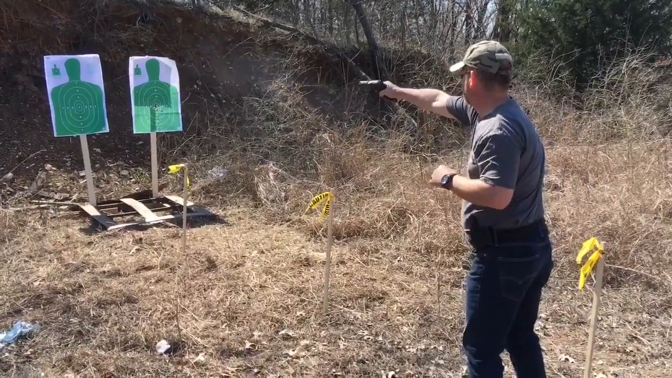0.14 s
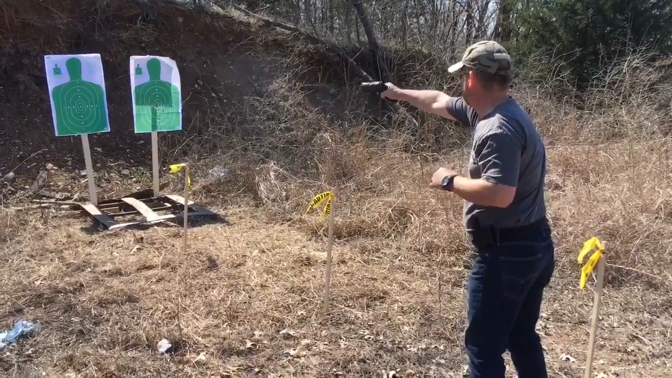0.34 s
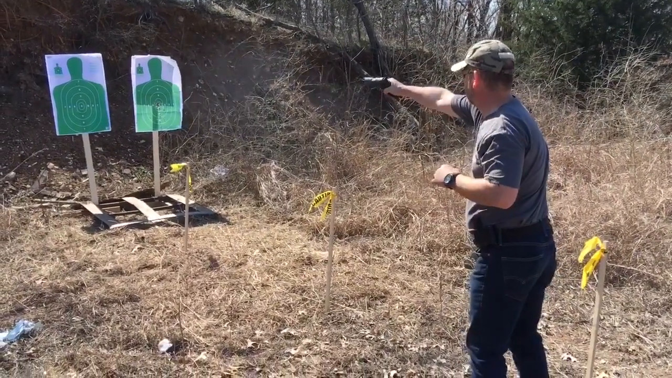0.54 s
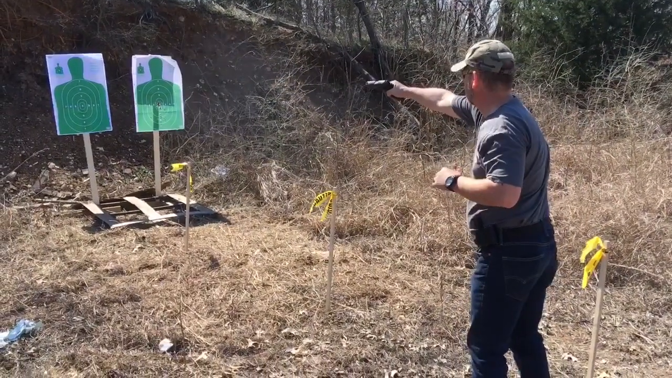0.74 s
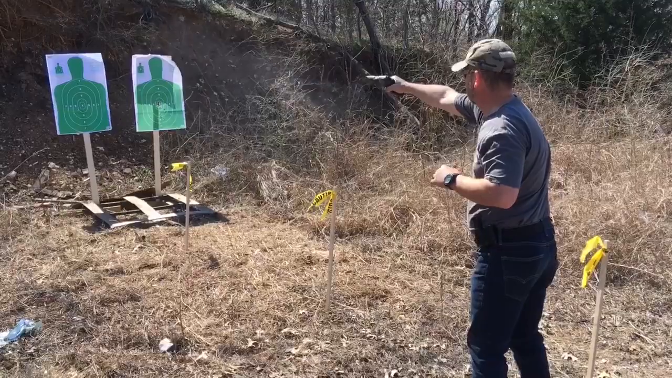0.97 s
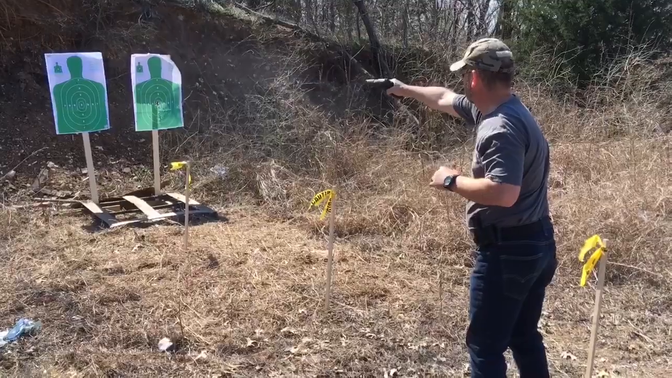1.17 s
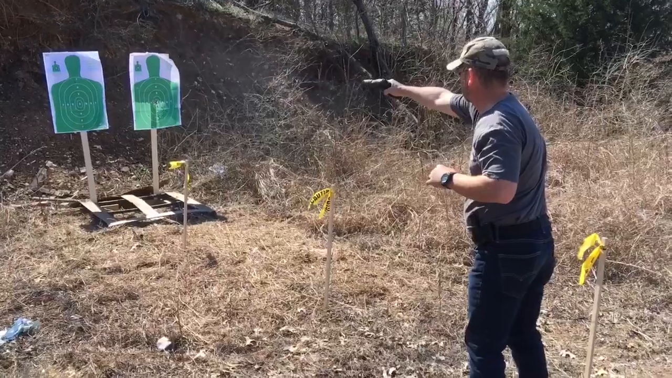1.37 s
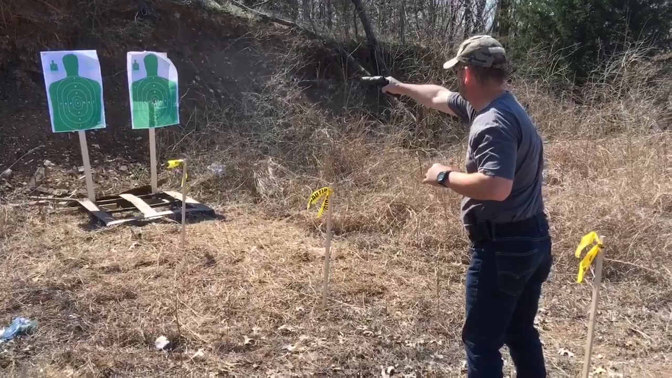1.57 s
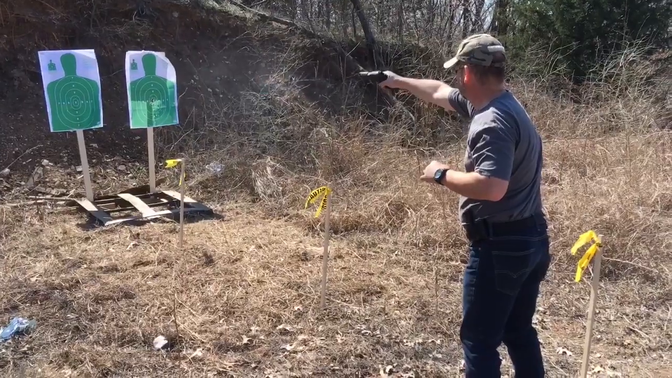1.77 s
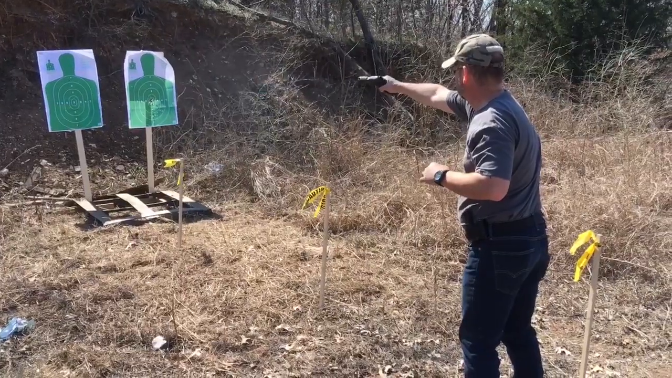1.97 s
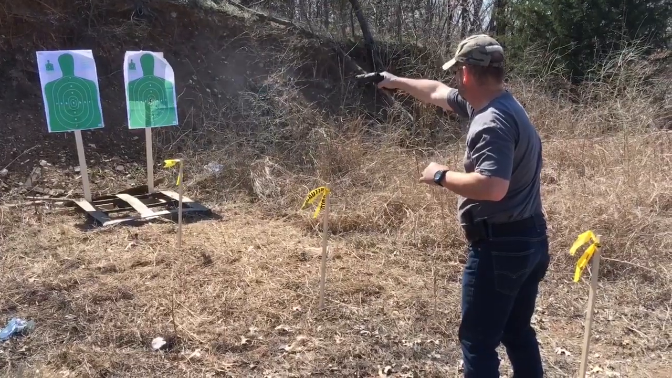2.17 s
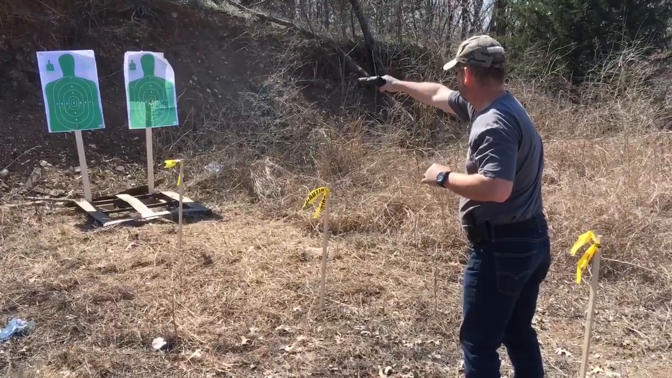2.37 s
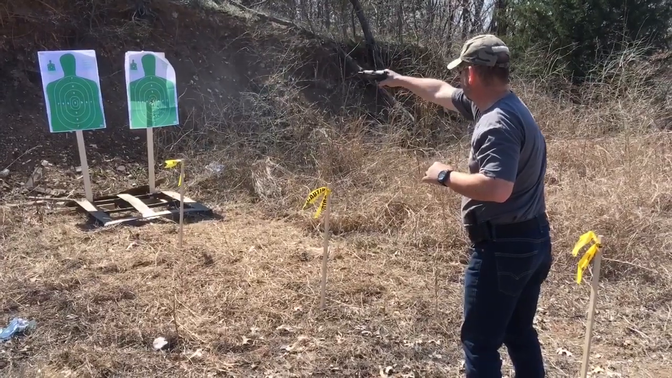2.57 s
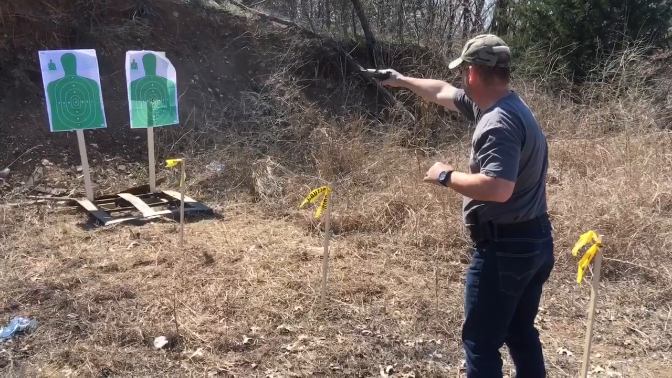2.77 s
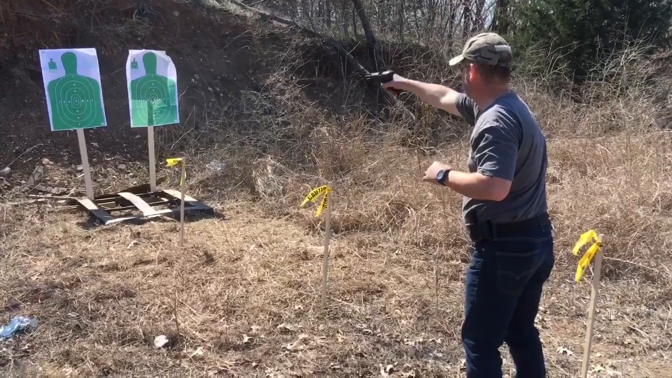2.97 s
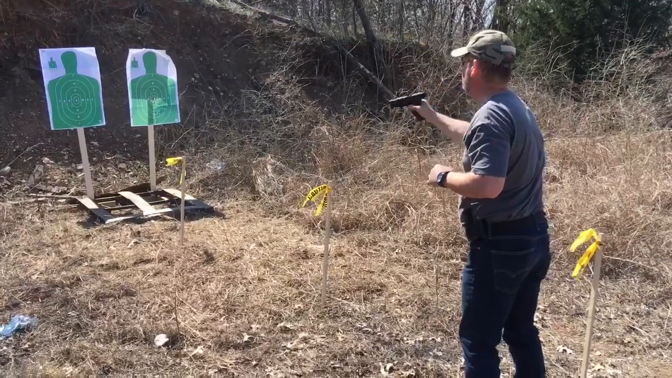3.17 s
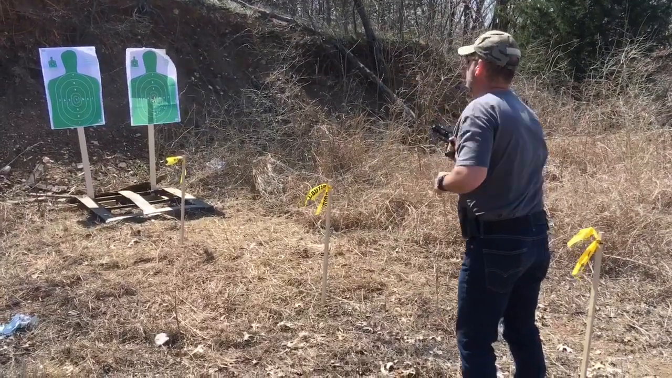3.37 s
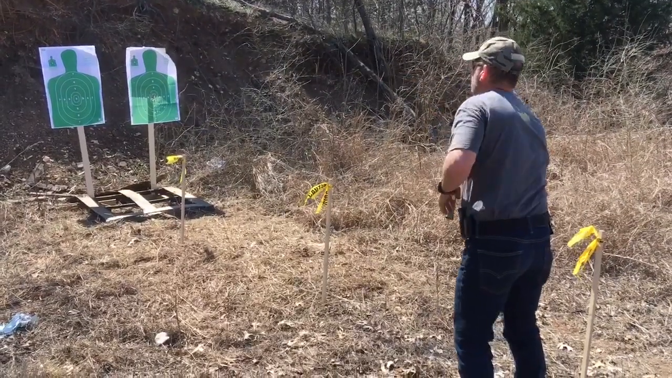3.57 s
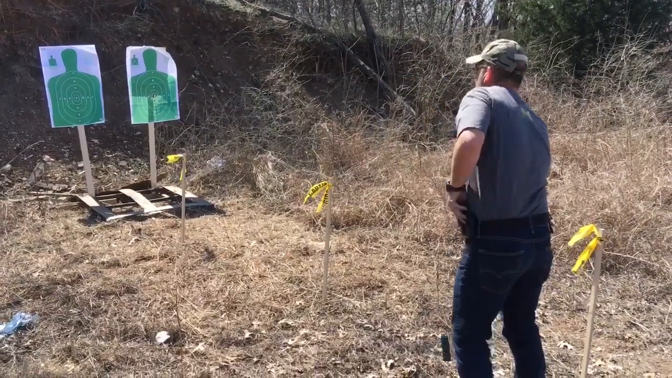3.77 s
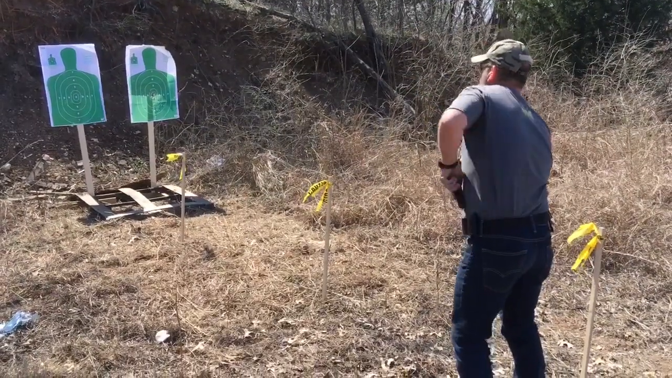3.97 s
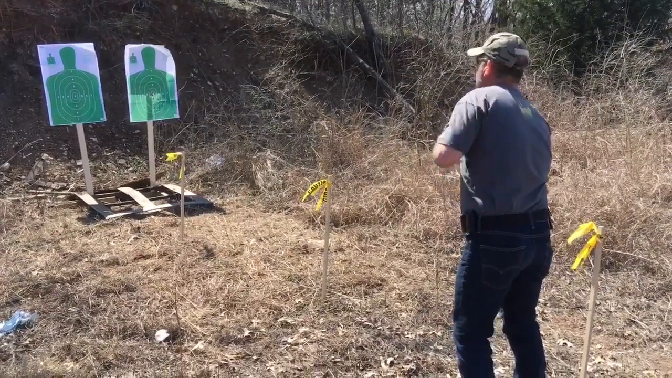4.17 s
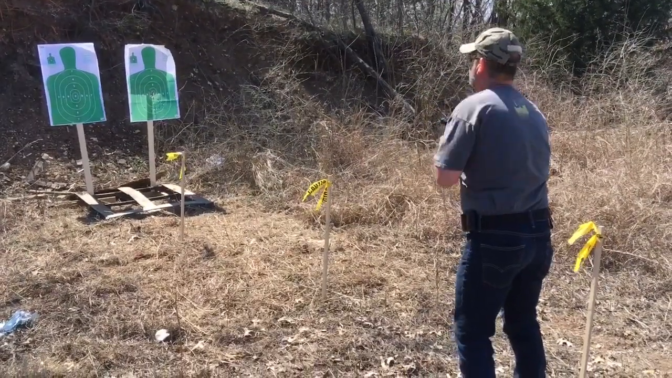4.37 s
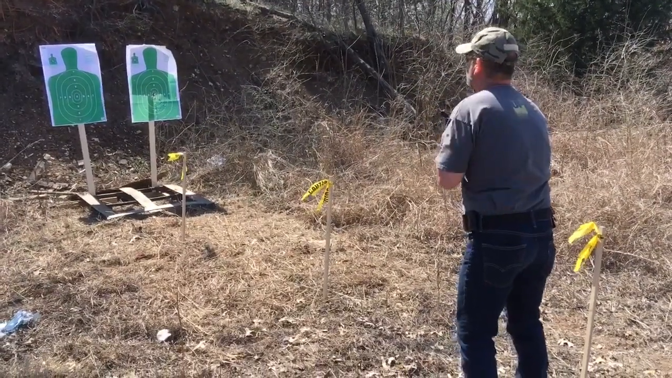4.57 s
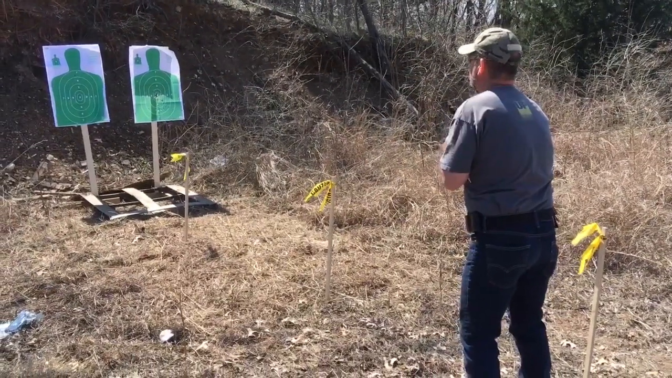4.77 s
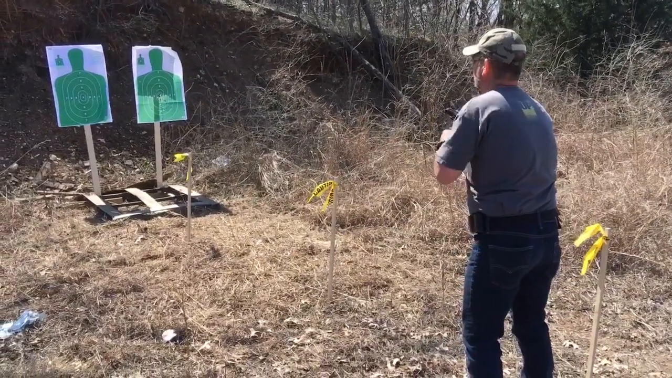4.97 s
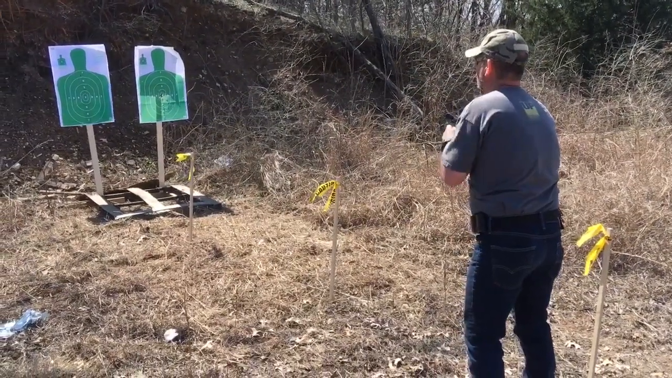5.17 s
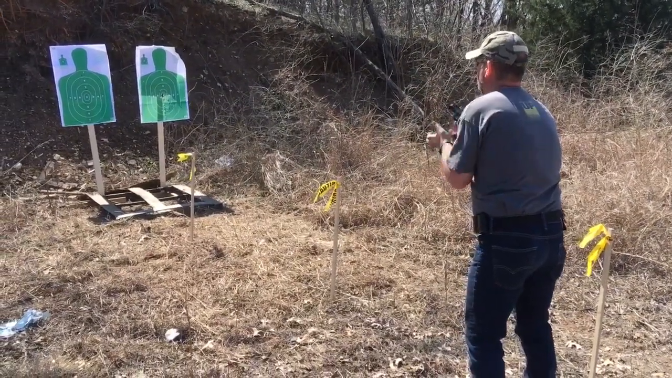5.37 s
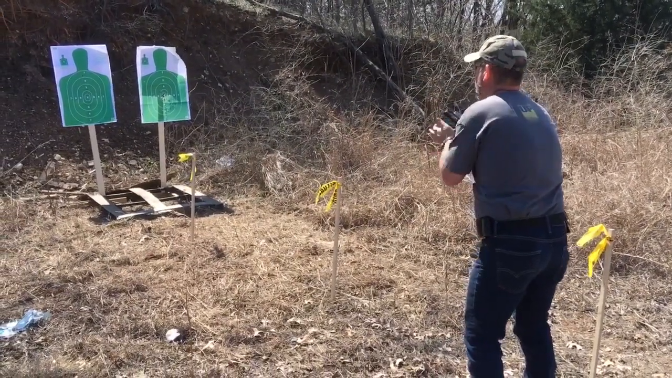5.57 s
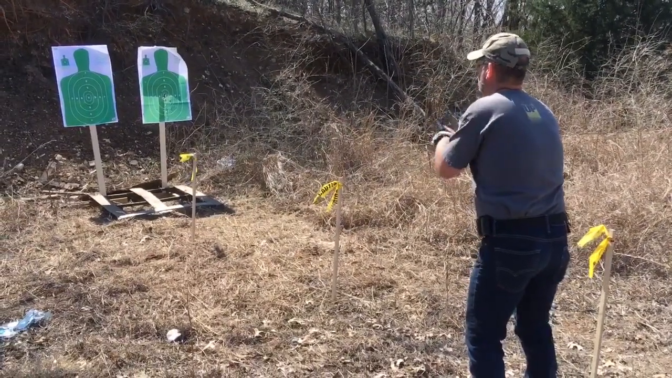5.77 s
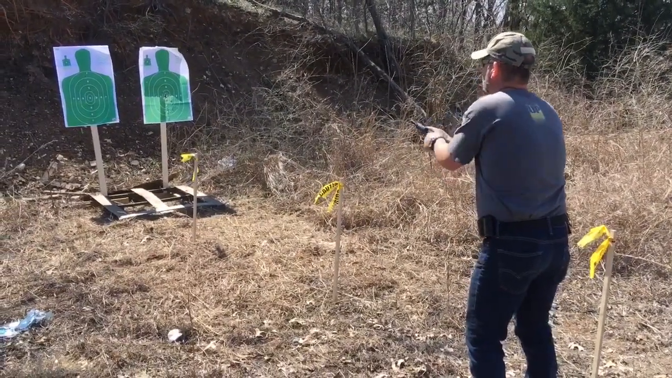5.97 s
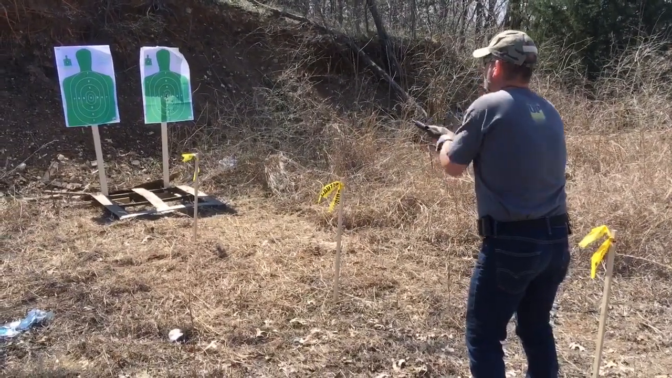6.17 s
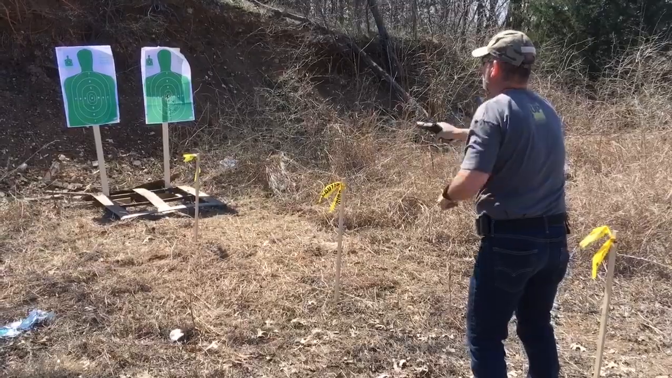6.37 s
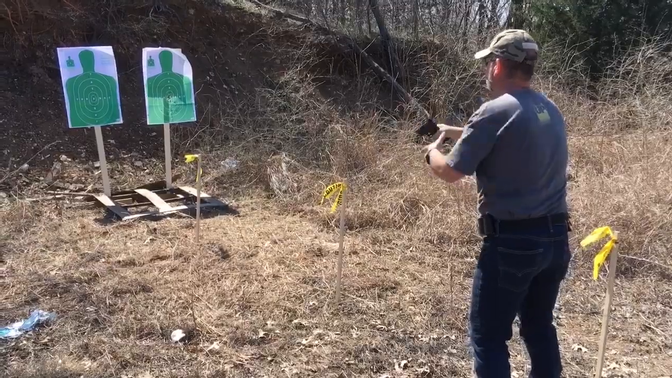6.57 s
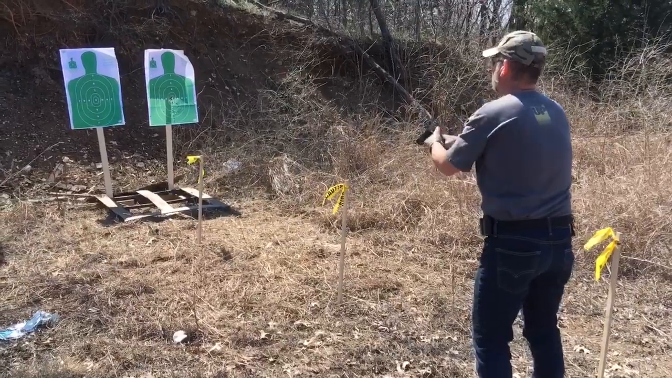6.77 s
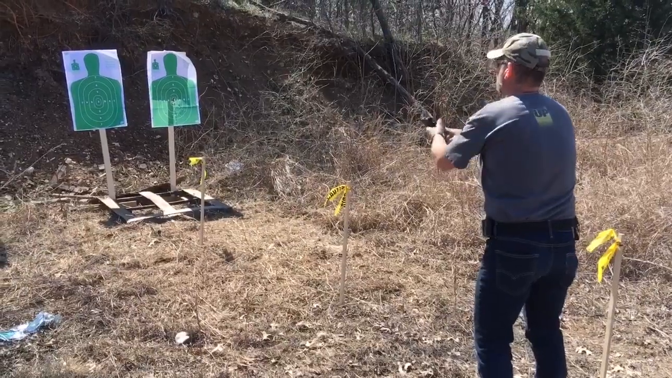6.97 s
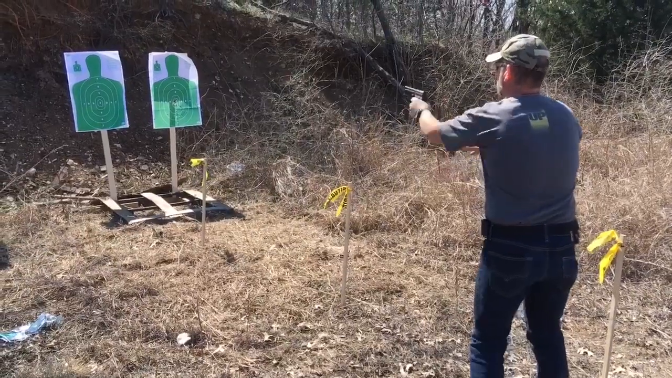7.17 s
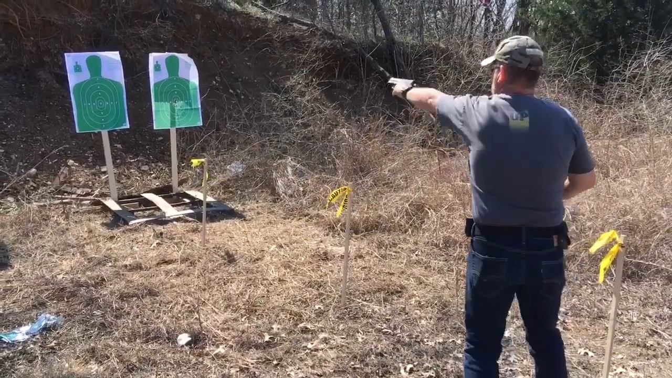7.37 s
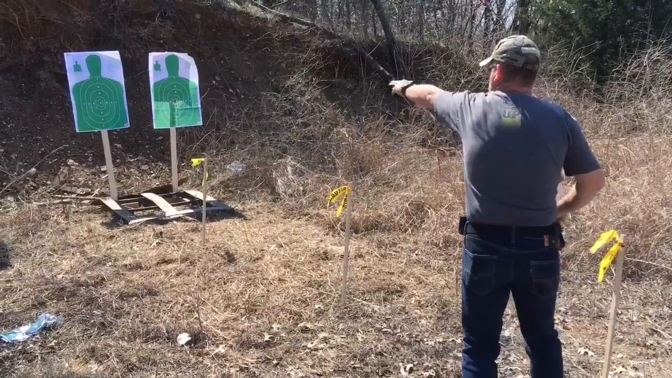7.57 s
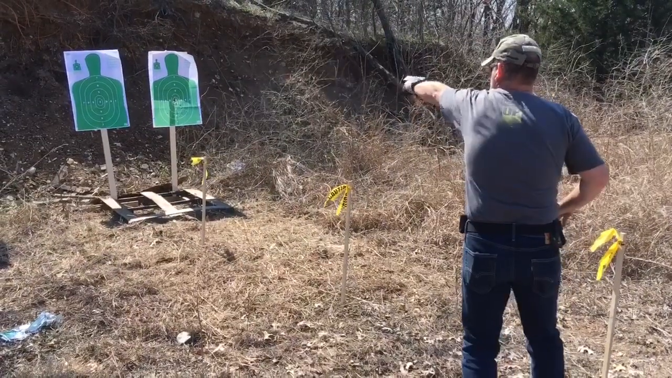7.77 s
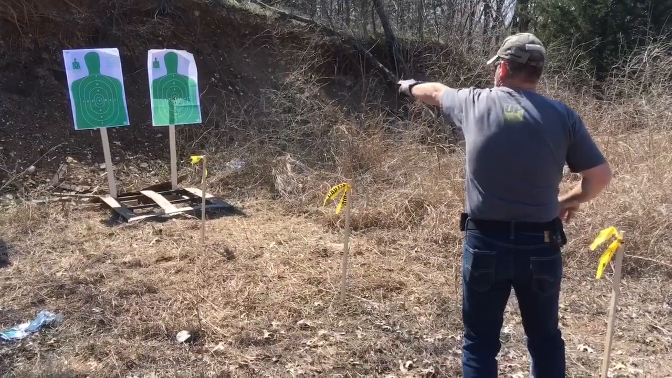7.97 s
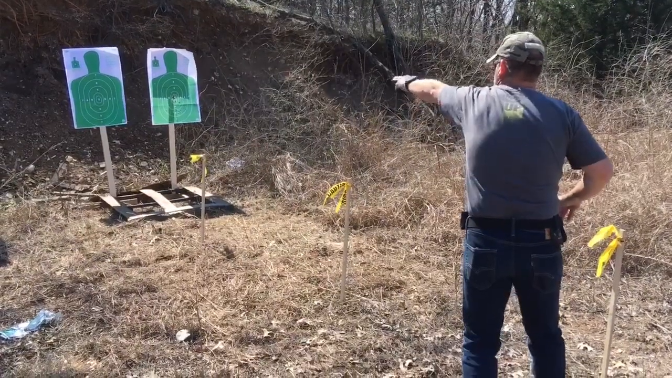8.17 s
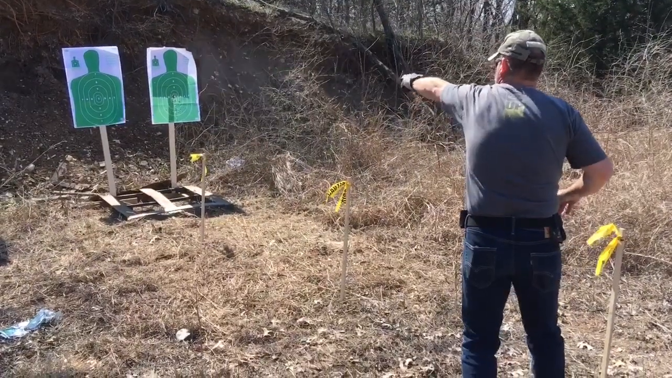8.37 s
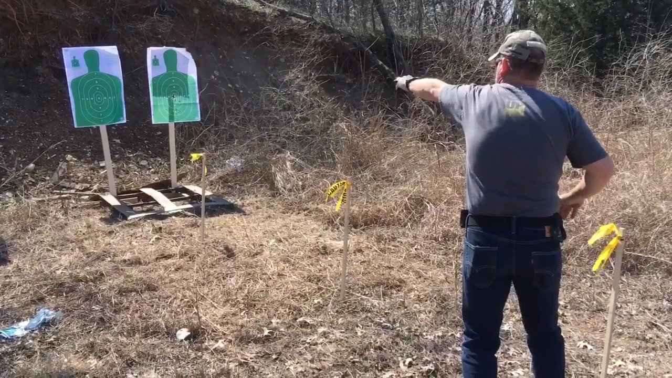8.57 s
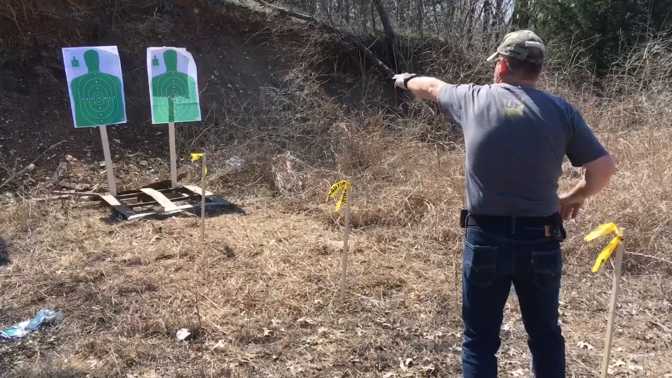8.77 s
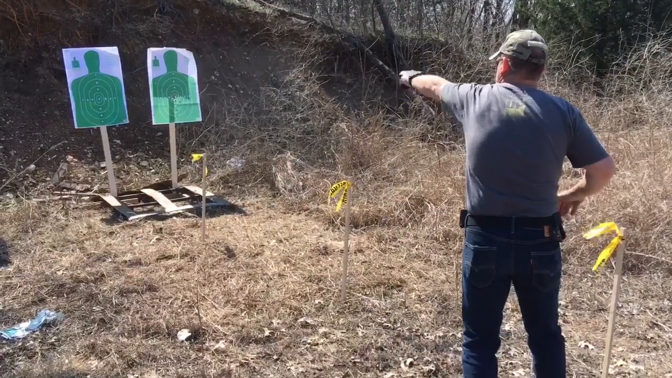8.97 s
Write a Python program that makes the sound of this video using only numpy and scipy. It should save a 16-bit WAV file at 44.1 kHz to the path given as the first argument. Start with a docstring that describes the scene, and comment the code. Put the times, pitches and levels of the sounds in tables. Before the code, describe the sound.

Outdoors before an earth bank and woods, a pistol fires at once, then at about 0.5, 0.9, 1.7, 2.2 and 2.5 seconds. Each shot has a brief dull lead-in, a hard clipped crack with bassy thump and crackle, a slap about 25 milliseconds later, scattered echoes and a noisy roll from the trees. The microphone's gain ducks at each peak, then the roll swells back. Barely audible casings tick in grass. From 3 to 5.4 the roll dies under small clicks, scrapes, soft knocks and rattle, with firmer clicks near 4.3 and 4.8. Sharp steel clacks stand out at 5.6 and, brightest, 6.3, with low wind buffets and faint rustle around them. After a thin scrape and soft knock near 7.2, three slower shots hit at 7.7, 8.3 and 8.9, their echoes rolling on to the end.

```python
"""Over light wind and a faint rustle, six pistol shots ring out at an outdoor range.
Each is a dull swell, then pressure waves and crackle that overload the microphone, a slap off an
earth berm, echoes and a roll of fading noise from the woods; spent brass ticks down in dry grass.
A magazine change follows, made of noise clicks, steel rings, scrapes and rattle; then three slower shots.
Gain control ducks under the loud peaks, then lets the far roll swell up again."""
import sys
import numpy as np
from scipy import signal
from scipy.fft import rfft, irfft, next_fast_len
from scipy.io import wavfile
from scipy.ndimage import uniform_filter1d, minimum_filter1d

SR = 44100
rng = np.random.default_rng(int(sys.argv[2]) if len(sys.argv) > 2 else 0)


def generate_wav(sig):
    """Save sig (samples, or channels by samples) to the path in sys.argv[1] as 16-bit PCM at SR."""
    pcm = np.round(np.clip(np.atleast_2d(sig).T, -1, 1) * 32767).astype(np.int16)
    wavfile.write(sys.argv[1], SR, pcm)


N = 397782
TIME = np.arange(N) / SR
DUCK_DB = 16   # shots are raised by this much; the gain control ducks by this much at most

# All levels in the tables are relative; later steps scale or vary many of them.
# The shots and how strong their parts are:
# [t/s, strength/dB, lead-in swell/dB, thump/dB, first boom/dB, second boom/dB]
SHOT_TABLE = [(.0078, 1, 13, 3.5, -0.5, 6), (0.4566, 0, -1, -5.5, 1, 0.5), (0.9027, 1, 0.5, -4, -1, -5.5),
              (1.7419, 4.5, 5, -15, 6.5, -4), (2.1665, 1, 1, -2.5, 4.5, 8), (2.519, 2, -2, 0.5, 7.5, 13),
              (7.7402, 4, 11.5, -1.5, 3, 8), (8.291, 0.5, 0, 3, -4, -18), (8.892, 1.5, 3.5, -1, -2, 0)]
# How long grass and brush ring at each pitch [f/Hz, time to fall 60 dB/s]
BRUSH_RING_TIMES = [(100, 0.58), (300, 0.1), (800, 0.48), (2000, .36), (5000, .3), (12000, .23)]
# Treble colour of a click [f/Hz, level/dB]
CLICK_TREBLE_COLOUR = [(1000, -16.5), (3500, -7), (5000, -3.5), (8500, 1), (12000, -2.5), (14500, -3),
                       (16000, -4)]


def from_db(db):
    """Decibels to gain."""
    return 10 ** (np.asarray(db) / 20)


def at_hz(points, hz):
    """Read a table on a log-frequency axis."""
    f, value = np.transpose(points)
    return np.interp(np.log(np.maximum(hz, 1)), np.log(f), value)


def gain_curve(rows, t):
    """Read a table of [t/s, level/dB] as a gain."""
    return from_db(np.interp(t, *np.transpose(rows)))


def add(out, s, sound):
    """Mix a sound in from time s on."""
    i = round(s * SR)
    part = sound[max(-i, 0):N - i]
    out[max(i, 0):max(i, 0) + len(part)] += part


def noise(spectrum, size):
    """Coloured noise with an average strength (rms) of 1 and nothing below 33 Hz."""
    n = next_fast_len(size)
    hz = np.arange(n // 2 + 1) * SR / n
    white = rfft(rng.standard_normal(n))
    x = irfft(white * from_db(at_hz(spectrum, hz)) * (hz > 33), n)[:size]
    return x / x.std()


def fade(t, t60):
    """Exponential decay by 60 dB in t60 seconds."""
    return np.exp(-np.log(1000) * t / max(t60, 1e-4))


def bump(t, centre, width):
    """A smooth rise and fall of height 1."""
    return np.exp(-((t - centre) / width) ** 2)


def lumps(size, per_s, depth_db):
    """A gain that wavers at random, per_s times a second, with an rms of 1."""
    along = TIME[:size] * per_s
    knots = rng.standard_normal(size // 20 + 2)
    gain = from_db(depth_db * np.interp(along, np.arange(len(knots)), knots))
    return gain / np.sqrt(np.mean(gain ** 2))


def ring(hz, t60):
    """A damped sine; with few cycles it is a single pressure wave."""
    t = TIME[:SR // 3]
    return np.sin(2 * np.pi * hz * t) * fade(t, t60)


def boom(hz, t60, rise):
    """A low heave of a few cycles with a soft start."""
    return ring(hz, t60) * (1 - np.exp(-TIME[:SR // 3] / rise))


def waves(paths, cycles):
    """One short pressure wave per path, a little different on every shot."""
    out = np.zeros(N)
    for (delay, db, hz), (loud, wide) in zip(paths, rng.standard_normal((len(paths), 2))):
        wave = ring(hz * np.exp(.09 * wide), cycles / hz)
        add(out, delay, from_db(db + 1.5 * loud) * wave)
    return out[:SR]


def wash(spectrum, t60s, start, rise, size):
    """Countless small reflections: noise that builds up, then dies at its own pace in each octave."""
    t = np.maximum(TIME[:size] - start, 0)
    whole = rfft(noise(spectrum, size))
    hz = np.arange(len(whole)) * SR / size
    octave = np.clip(np.log2(np.maximum(hz, 1) / 110), 0, 7)   # octaves above 110 Hz
    total = 0
    for k in range(8):
        band = irfft(whole * np.maximum(1 - abs(octave - k), 0), size)
        total = total + band * fade(t, at_hz(t60s, 110 * 2 ** k))
    return total * (1 - np.exp(-(t / rise) ** 2))


def wind():
    """Low rumble on the microphone; each buffet is a puff of air inside a brief gust."""
    # low buffets of air on the microphone [t/s, peak level/dB]
    buffets = [(4.824, -29), (5.055, -35.5), (5.284, -27.5), (5.574, -32), (5.62, -28), (5.843, -27),
               (5.926, -28.5), (6.004, -34), (6.184, -27.5), (6.494, -27.5), (6.57, -37), (6.904, -38.5),
               (7.061, -30.5), (7.117, -35.5), (7.204, -27.5), (7.26, -22), (7.331, -32)]
    # rumble between buffets [t/s, level/dB]
    breeze = [(2.9, -62), (3.65, -52), (4.62, -56.5), (5.08, -47.5), (5.89, -47), (5.99, -41.5),
              (6.87, -49), (7.22, -39.5), (7.42, -52), (7.7, -52)]
    # colour of the rumble [f/Hz, level/dB]
    rumble_colour = [(12, -42), (20, -9.5), (43, 3.5), (75, 4), (286, -23), (484, -42), (524, -39.5),
                     (780, -48.5), (900, -44), (1170, -69), (1980, -120)]
    puff_colour = [(20, -24.5), (45, -7.5), (90, 5), (220, -2.5), (450, -22.5), (1200, -51.0), (4000, -55.0)]
    gust_db, gust_lag_s, gust_width_s = -15, .02, 0.035   # gust level is relative to its buffet
    flow = gain_curve(breeze, TIME) * lumps(N, per_s=19, depth_db=2.5)
    out, t = np.zeros(N), TIME[:SR // 8]
    for s, db in buffets:
        flow = flow + from_db(db + gust_db) * bump(TIME, s + gust_lag_s, gust_width_s)
        puff = noise(puff_colour, len(t))
        add(out, s, from_db(db) * puff * fade(t, 0.096) * (1 - np.exp(-t / 0.0034)))
    return out + flow * noise(rumble_colour, N)


def rustle(handling):
    """A faint steady rustle of dry grass, and a hiss that hangs on after each sharp sound of the gun."""
    # colour of rustle and hiss [f/Hz, level/dB]
    colour = [(530, -25), (900, -2), (2020, -14), (2250, -3), (4800, -4), (5750, -4), (15100, -6.5),
              (16000, 3)]
    floor_db, hiss_db, hold_s = -69, -58, 0.394
    follows = .42   # share of the handling's level in dB that the hiss follows
    size = int(hold_s * SR)
    loudest = -minimum_filter1d(-abs(handling), size, origin=(size - 1) // 2, mode="constant")
    hiss = from_db(hiss_db) * uniform_filter1d(loudest ** follows, size=512)
    return np.hypot(from_db(floor_db), hiss) * noise(colour, N)


def still_air():
    """A faint, steady background of coloured noise."""
    # colour of the still air [f/Hz, level/dB]
    colour = [(20, -15), (60, 10), (120, 9.5), (300, 0.5), (800, -4.5), (2000, -9.5), (6000, -19.5),
              (16000, -16.5)]
    return from_db(-63.5) * noise(colour, N)


def swell(level_db, depth_db):
    """A dull swell of noise leads into the crack over some twenty milliseconds."""
    # colour of the swell [f/Hz, level/dB]
    colour = [(80, -11), (200, 4), (450, 1.5), (800, -12), (1350, -13.5), (1650, -10.5), (1950, -25),
              (2700, -26.5), (3100, -14), (3500, -37.5), (4500, -36), (16000, -40.5)]
    size = SR // 42
    along = np.linspace(0, 1, size)
    loudness = from_db(level_db - depth_db * (1 - along))
    return loudness * noise(colour, size) * signal.windows.tukey(size, .1)


def crackle():
    """Bright noise of the overload: a sharp crack, a sizzle that dies, and a burst with the slap."""
    # colour of the crackle [f/Hz, level/dB]
    colour = [(120, 13), (300, 13), (600, 8), (1100, 14), (2000, 4.5), (3200, 3.5), (4900, -2.5),
              (5700, 3.5), (9000, 0.5), (10300, -1), (12500, 0), (16000, -2.5)]
    t = TIME[:SR // 20]
    crack = from_db(-5) * fade(t, t60=.009)
    sizzle = from_db(-9.5) * fade(t, t60=0.11)
    onset = 1 - np.exp(-(t / 0.0013) ** 2)
    burst = from_db(-10.5) * bump(t, centre=.028, width=0.0019)
    return ((crack + sizzle) * onset + burst) * noise(colour, len(t))


def blast():
    """The muzzle blast's pressure waves and their slap off the berm, covered in crackle."""
    # the blast and its bounces off the ground nearby [delay/s, level/dB, centre f/Hz]
    bounces = [(.0004, -10.5, 800), (.0023, 3, 520), (.0043, -6, 780), (.006, -7, 326.4)]
    slap_s, slap_db, slap_pitch_ratio = .0245, 5.5, 1.5
    out = waves(bounces, cycles=2.9)
    # the berm throws the whole blast back, a little thinner
    thinner = [(delay, db, hz * slap_pitch_ratio) for delay, db, hz in bounces]
    add(out, slap_s, from_db(slap_db) * waves(thinner, cycles=3.6)[:SR // 2])
    add(out, 0, crackle())
    return out


def thump():
    """The chesty part of the blast: a low heave whose pitch varies from shot to shot."""
    return boom(177 * rng.uniform(.85, 1.2), t60=0.037, rise=0.0045)


def brush():
    """Uneven scatter from the grass and brush around the berm."""
    # colour of the scatter [f/Hz, level/dB]
    colour = [(25, -24.5), (70, -15), (170, -6.5), (270, -11.5), (400, 2.5), (680, -7.5), (1000, -8.5),
              (1600, -9.5), (2100, -11), (2700, -11.5), (4800, -16.5), (6000, -12.5), (10000, -15.5),
              (16000, -20.5)]
    size = SR // 2
    scatter = wash(colour, BRUSH_RING_TIMES, start=0.024, rise=.003, size=size)
    return from_db(-16.5) * scatter * lumps(size, per_s=180, depth_db=3.0)


def hollow():
    """The bay in front of the berm rings faintly at several pitches."""
    # pitches that the hollow holds for a moment [f/Hz, level/dB, time to fall 60 dB/s]
    pitches = [(394, -32.5, 0.49), (498, -34.5, 0.17), (535, -28.5, .3), (601, -33.5, 0.15),
               (654, -30.5, 0.46), (820, -34.5, 0.37), (1062, -35, .28), (1309, -35, 0.35),
               (1880, -39, 0.14)]
    return sum(from_db(db) * rng.choice([-1, 1]) * ring(hz, t60) for hz, db, t60 in pitches)


def trunks(count):
    """Weaker echo paths from trunks, fewer and fainter with distance: [delay/s, level/dB, centre f/Hz]."""
    near_s, far_s = 0.054, 0.18
    near_db, fall_db_per_s, centre_hz = -18, 106, 810
    early, loud, wide = rng.standard_normal((count, 3)).T
    delay = np.geomspace(near_s, far_s, count) * np.exp(.04 * early)
    db = near_db - fall_db_per_s * (delay - near_s) + 2 * loud
    return list(zip(delay, db, centre_hz * np.exp(0.26 * wide)))


def trees():
    """The nearer roll: many small reflections that die within about a second."""
    # colour of the roll [f/Hz, level/dB]
    colour = [(20, -37.5), (60, -18), (150, -15.5), (230, -17), (350, -9), (600, -3.5), (1000, -3),
              (1500, -9.5), (2500, -11.5), (6000, -22), (14000, -31.5)]
    # how long it rings [f/Hz, time to fall 60 dB/s]
    ring_times = [(100, 1.8), (700, 0.85), (2000, 0.93), (5000, .65), (12000, 0.37)]
    return from_db(-35.0) * wash(colour, ring_times, start=.08, rise=0.031, size=SR * 3 // 2)


def steel():
    """Each contact rings the gun's parts with other strengths; the grip damps them and shifts their pitch."""
    # ringing parts of the gun, before random changes [f/Hz, level/dB, time to fall 60 dB/s]
    parts = [(1875, -20, .03), (2260, -9.5, 0.029), (3330, 1, 0.038), (3730, 9.5, 0.022),
             (5510, 0.5, 0.045), (7000, -4.5, 0.077), (8700, -2, 0.02), (9000, -6.5, 0.12),
             (10700, -11, .04), (13500, -8, .03)]
    out = 0
    for hz, db, decay in parts:
        strength = from_db(db + rng.normal(0, 4)) * rng.choice([-1, 1])
        out = out + strength * ring(hz * rng.uniform(.94, 1.06), min(decay, .06))
    return out


def contact(body_db, treble_db, t60):
    """One hard contact: a knock, a grainy snap and a brief ring of steel that grows with both."""
    # body colour of a click [f/Hz, level/dB]
    body_colour = [(200, -35.5), (600, -2), (1500, 3.5), (3300, 7), (4500, -0.5), (7000, -38), (16000, -47)]
    t = TIME[:SR // 10]
    body = from_db(body_db) * noise(body_colour, len(t))
    treble = from_db(treble_db) * noise(CLICK_TREBLE_COLOUR, len(t))
    snap = (body + treble) * fade(t, t60) * lumps(len(t), per_s=980, depth_db=5.5)
    # the treble sets 0.43 of the ring's level in dB, the body the rest
    ring_db = -17.5 + body_db + 0.43 * (treble_db - body_db)
    return snap + from_db(ring_db) * steel()[:len(t)]


def casings():
    """Faint bright ticks as each spent casing bounces in the dry grass."""
    flight_s, scatter_s, body_db, treble_db = .27, 0.3, -66, -45
    out = np.zeros(N)
    for s, *_ in SHOT_TABLE:
        for late, loud in zip(rng.random(3), rng.normal(0, 2.7, 3)):
            landing = min(s + flight_s + scatter_s * late, N / SR)
            add(out, landing, contact(body_db + loud, treble_db + loud, t60=.025))
    return out


def woods():
    """The far roll: reflections that build up slowly and die over seconds."""
    # colour of the roll [f/Hz, level/dB]
    colour = [(20, -28.5), (60, -7), (120, -9), (250, -18.5), (450, -6.5), (900, 2.5), (1400, -5.5),
              (2500, -15), (4000, -27), (7000, -43.5), (16000, -51.5)]
    # how long it rings [f/Hz, time to fall 60 dB/s]
    ring_times = [(100, 4.3), (700, 2.22), (2000, 2), (6000, 0.98)]
    return from_db(-43.0) * wash(colour, ring_times, start=0.43, rise=0.62, size=SR * 4)


def far_thump():
    """A distant slope sends back only a dull, smeared thud."""
    colour = [(40, -13.5), (110, 1.5), (200, 3.0), (300, -20.5), (450, -25), (1200, -49.0), (4000, -64.5)]
    t = TIME[:SR // 6]
    thud = noise(colour, len(t))
    return from_db(-44) * thud * fade(t, 0.1) * (1 - np.exp(-t / 0.0029))


def pistol():
    """Every shot takes the same paths, so its echoes are largely alike."""
    # distinct echoes from the banks [delay/s, level/dB, centre f/Hz]
    bank_echoes = [(.047, -12, 650), (.0515, -9.5, 450), (0.0807, -11.5, 711), (0.0825, -1, 1570),
                   (.0985, -14, 750), (.1225, -14.5, 774), (0.1545, -23.5, 806)]
    out, same_brush = np.zeros(N), brush()
    paths = bank_echoes + trunks(count=12)
    near_roll, far_roll = trees(), woods()
    for s, shot_db, swell_db, thump_db, first_db, second_db in SHOT_TABLE:
        strength = from_db(shot_db)
        add(out, s - .022, from_db(swell_db) * swell(level_db=-15, depth_db=22))
        add(out, s, strength * blast())
        add(out, s + .006, from_db(thump_db) * thump())
        # the bass heaves after the blast and again after the slap
        add(out, s + .0085, from_db(first_db) * boom(hz=79.6, t60=0.032, rise=.002))
        add(out, s + .0315, -from_db(second_db) * boom(hz=67, t60=0.051, rise=0.0057))
        add(out, s, strength * (0.73 * same_brush + 0.42 * brush()))
        add(out, s + .03, strength * hollow())
        add(out, s, strength * waves(paths, cycles=3.5))
        add(out, s, near_roll * lumps(len(near_roll), per_s=80, depth_db=2.0))
        far_gain = lumps(len(far_roll), per_s=20, depth_db=2.5)
        add(out, s + rng.uniform(0, 0.0051), far_roll * far_gain)
        add(out, s + .499, far_thump())
    return from_db(DUCK_DB) * out


def clicks():
    """Hard contacts of magazine, slide and holster."""
    # clicks and clacks [t/s, body level/dB, treble level/dB]
    click_table = [(2.8716, -59.5, -33), (3.2357, -68, -48), (3.3714, -44, -47), (3.692, -53, -45),
                   (3.744, -47, -29.5), (3.9452, -52, -30), (3.9556, -46.5, -26.5), (4.316, -27.5, -29.5),
                   (4.5745, -52, -47.5), (4.674, -47.5, -50.5), (4.8125, -29.5, -24), (4.9484, -48, -46),
                   (4.9952, -38.5, -70), (5.0284, -49, -42), (5.232, -41.5, -40), (5.306, -40, -42.5),
                   (5.367, -39, -40), (5.5847, -28, -26), (5.5927, -22, -10), (5.5981, -19.5, -9.5),
                   (5.824, -54, -55), (6.073, -52, -32), (6.0839, -28, -16), (6.1925, -48.5, -33.5),
                   (6.2816, -28.5, -16.5), (6.2899, -21, -3.5), (6.3071, -18.5, -9.5)]
    out = np.zeros(N)
    for s, body_db, treble_db in click_table:
        add(out, s, contact(body_db, treble_db, t60=0.027))
    return out


def scrapes():
    """Cloth and steel sliding: gritty strokes that catch quickly and ease off."""
    # the strokes [t/s, length/s, level/dB]
    strokes = [(3.077, .014, -45), (3.452, 0.055, -43), (3.761, .03, -43.5), (3.882, 0.05, -46),
               (3.932, 0.096, -39), (4.193, 0.09, -48), (4.339, 0.13, -56.5), (5.583, 0.029, -21.5),
               (6.254, 0.077, -37.5), (6.277, 0.053, -26.5), (6.76, 0.042, -54), (7.153, 0.35, -56.5),
               (7.442, 0.35, -59)]
    colour = [(900, -40), (2500, 2), (5000, 2), (9000, 3), (16000, 5)]
    out = np.zeros(N)
    for s, length, db in strokes:
        along = np.minimum(TIME[:SR // 2] / length, 1)
        stroke = np.sin(np.pi * np.sqrt(along))
        grit = noise(colour, len(along)) * lumps(len(along), per_s=540, depth_db=4.0)
        add(out, s, from_db(db) * stroke * grit)
    return out


def rattle():
    """Small chance contacts of cartridges and magazine."""
    # spells of loose rattle while the magazine is handled [start t/s, end t/s, ticks per s, level/dB]
    spells = [(3.199, 4.15, 18, -54.5), (4.84, 5.375, 45, -52), (5.623, 6.247, 22, -55.5),
              (6.32, 6.396, 50, -46.5)]
    spread_db = 7.5
    out = np.zeros(N)
    for start, end, per_s, db in spells:
        for _ in range(round((end - start) * per_s)):
            # one shared change of level, and a smaller one each for body and treble
            change = rng.uniform(-1, 1) + .5 * rng.uniform(-1, 1, 2)
            body_db, treble_db = db + spread_db * change
            add(out, rng.uniform(start, end), contact(body_db, treble_db, t60=0.03))
    return out


def pings():
    """Parts left ringing by a contact: damped sines."""
    # the ringing parts [t/s, f/Hz, level/dB, time to fall 60 dB/s]
    ping_table = [(3.745, 8700, -50, 0.34), (4.813, 9250, -37.5, 0.093), (6.085, 6280, -32.5, 0.07),
                  (6.282, 7080, -9.5, .033)]
    out = np.zeros(N)
    for s, hz, db, t60 in ping_table:
        add(out, s, from_db(db) * ring(hz, t60))
    return out


def handling_echo():
    """The berm's answer to a single click: a short wash and two distinct echoes."""
    size = SR // 2
    field = wash(CLICK_TREBLE_COLOUR, BRUSH_RING_TIMES, start=.004, rise=.004, size=size)
    field = from_db(-44.0) * field * fade(TIME[:size], t60=.9)
    add(field, .03, from_db(-29) * ring(3500, 0.00093))
    add(field, .083, from_db(-32.5) * ring(2300, 0.00085))
    return field


def reload():
    """Clicks, scrapes, rattle and pings of the gun, echoed by the berm, without bass."""
    direct = clicks() + scrapes() + rattle() + pings()
    echoed = direct + signal.fftconvolve(direct, handling_echo())[:N]
    # small parts give off no bass: cut below 400 Hz
    return signal.sosfilt(signal.butter(3, 400, "high", fs=SR, output="sos"), echoed)


def knocks():
    """Soft, heavy contacts ring for only a few cycles."""
    # dull knocks of hand and holster [t/s, f/Hz, level/dB]
    knock_table = [(3.748, 190, -25), (3.943, 160, -24.5), (7.265, 270, -27)]
    out = np.zeros(N)
    for s, hz, db in knock_table:
        add(out, s, from_db(db) * boom(hz, t60=0.032, rise=0.00087))
    return out


def scene():
    """Shots, casings and gun handling over wind, rustle and still air."""
    handling = reload()
    background = wind() + rustle(handling) + still_air()
    return (background + pistol() + casings() + handling + knocks())[None]


def gain_control(x, threshold_db, hold, recover_db_per_s):
    """The gain drops just ahead of a loud peak, stays down, then creeps back."""
    over = np.clip(20 * np.log10(abs(x) + 1e-9) - threshold_db, 0, DUCK_DB)
    ahead = SR // 40   # samples by which the drop comes early
    size = int(hold * SR) + ahead
    held = -minimum_filter1d(-over, size, origin=(size - 1) // 2 - ahead, mode="constant")
    recovery = recover_db_per_s * TIME
    duck = np.maximum.accumulate(held + recovery) - recovery
    return x * from_db(-uniform_filter1d(duck, size=128))


def record(dry):
    """Gain control, rounded peaks, and the top cut off above 15900 Hz."""
    x = gain_control(dry[0], threshold_db=3.5, hold=0.45, recover_db_per_s=133.0)
    x = x / (1 + (x / .9) ** 4) ** (1 / 4)   # peaks bend over towards 0.9
    return signal.sosfilt(signal.ellip(10, .1, 90, 15900, fs=SR, output="sos"), x)[None]


dry = scene()
out = record(dry)
generate_wav(out)
```